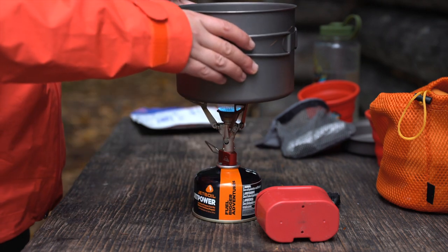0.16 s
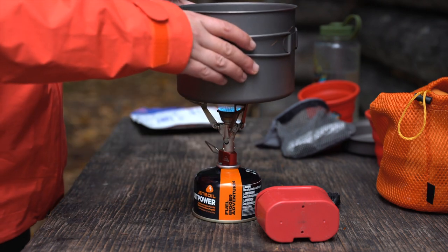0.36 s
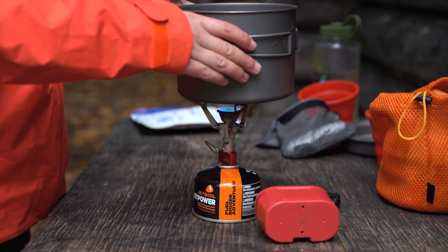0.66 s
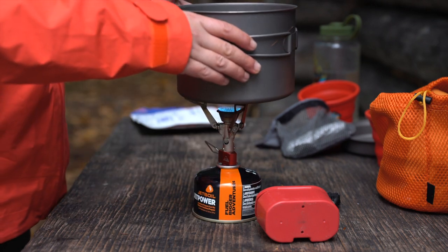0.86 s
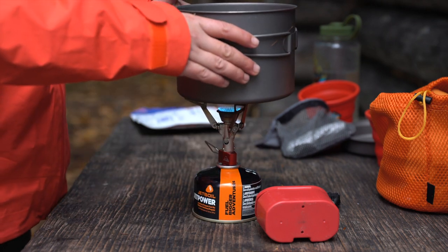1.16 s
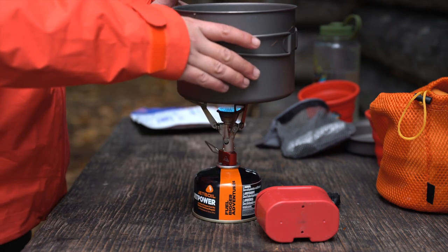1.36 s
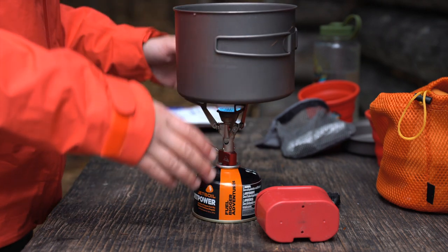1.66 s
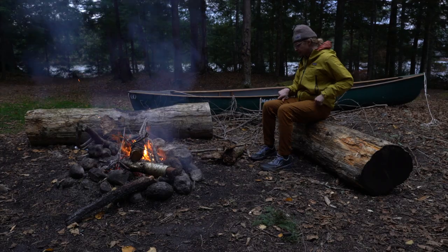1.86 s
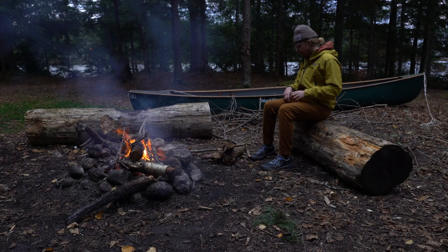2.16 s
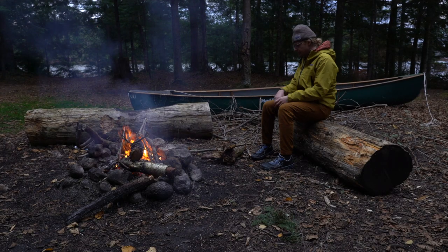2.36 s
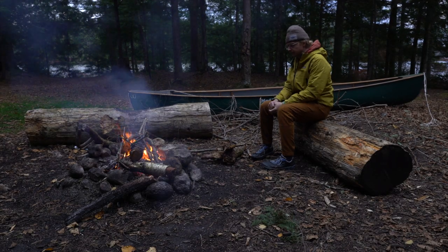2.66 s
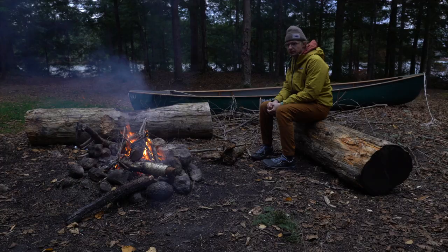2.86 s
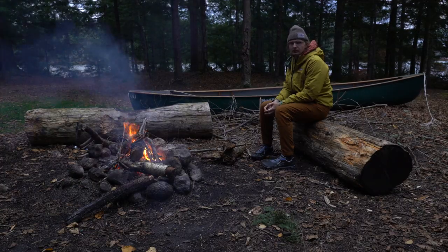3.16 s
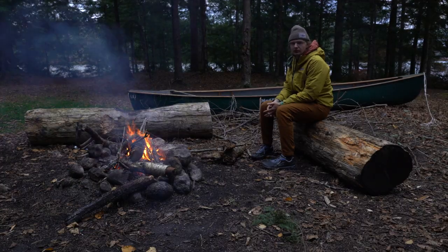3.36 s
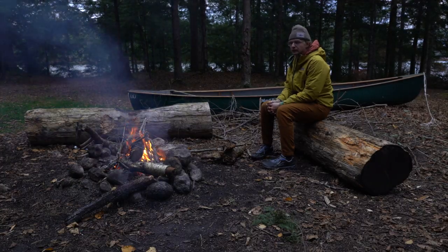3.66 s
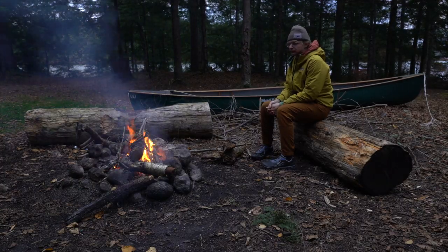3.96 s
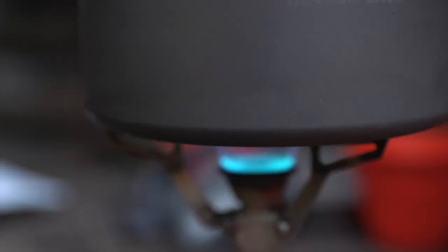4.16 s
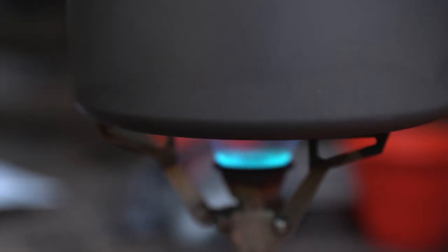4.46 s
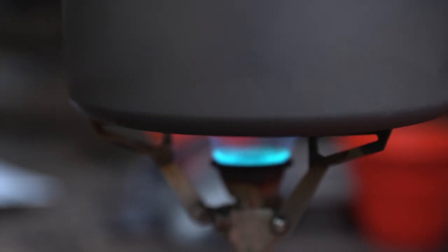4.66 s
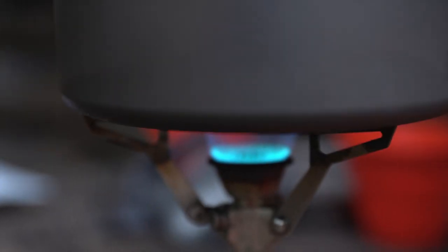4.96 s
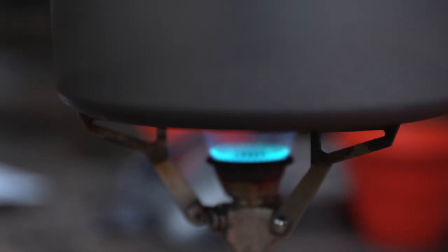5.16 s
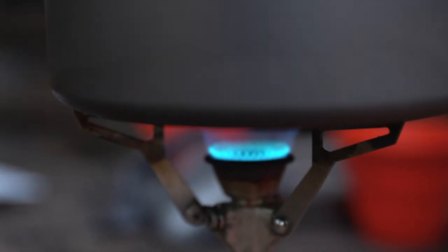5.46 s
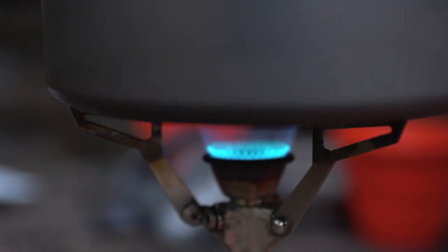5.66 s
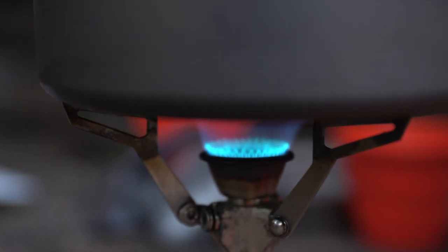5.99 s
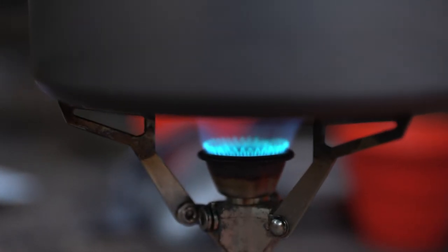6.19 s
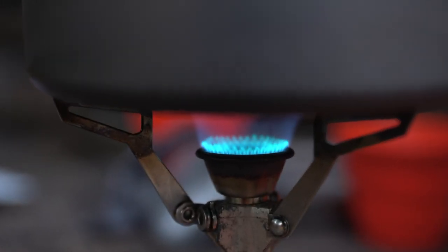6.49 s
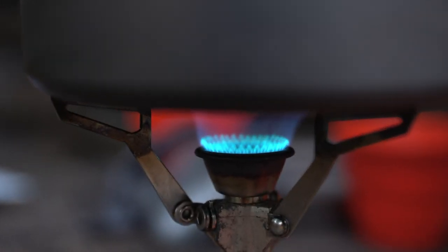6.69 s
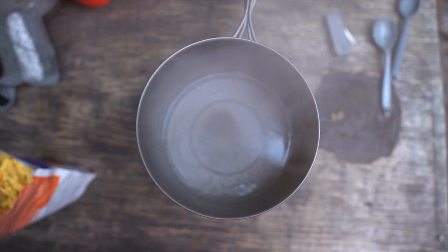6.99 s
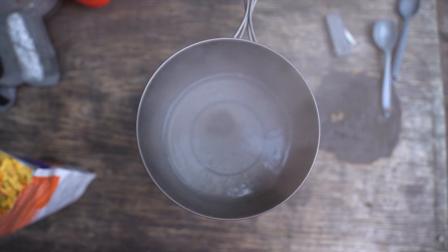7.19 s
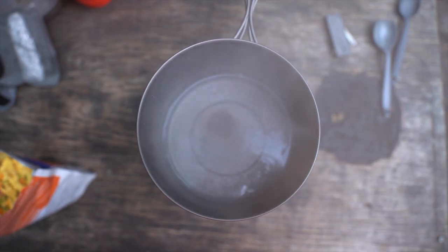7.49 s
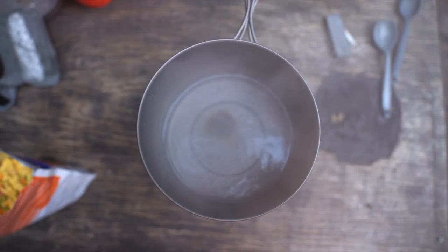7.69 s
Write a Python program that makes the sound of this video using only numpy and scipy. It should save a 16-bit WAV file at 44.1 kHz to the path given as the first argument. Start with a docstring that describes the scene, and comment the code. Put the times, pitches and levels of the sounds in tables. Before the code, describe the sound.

A gas camping stove roars softly under a ticking metal pot that clanks down, with a brief cut to a crackling campfire.

```python
"""In a forest, a gas camping stove burns under a metal pot, heard from beside it, close up and from above.
Turbulent gas roars through the resonances of the burner and of the gap under the pot. The pot ticks
by stick-slip on its hot steel supports and lands with a clank; jacket cloth rustles by friction.
Between the first two positions the scene cuts to a campfire that flutters, pops and vents steam.
Ticks, clanks and pops echo off the trunks, and loud peaks make a limiter duck the flame."""
import sys
import numpy as np
from scipy import signal
from scipy.fft import rfft, irfft, next_fast_len
from scipy.io import wavfile
from scipy.ndimage import uniform_filter1d, minimum_filter1d, map_coordinates

SR = 44100
rng = np.random.default_rng(int(sys.argv[2]) if len(sys.argv) > 2 else 0)


def generate_wav(sig):
    """Save sig (samples, or channels by samples) to the path in sys.argv[1] as 16-bit PCM at SR."""
    pcm = np.round(np.clip(np.atleast_2d(sig).T, -1, 1) * 32767).astype(np.int16)
    wavfile.write(sys.argv[1], SR, pcm)


N = 345285
TIME = np.arange(N) / SR
HIT_TIME = np.arange(SR // 8) / SR
LEAD, TAIL = 512, 12288  # samples of room before a hit, samples of its echo

# Bounds in seconds of the four views: stove side, campfire, stove close up, stove from above.
CUTS = [0.001, 1.726, 4.158, 6.759, 7.9]
# Turbulence spectra. Each row: frequency in Hz, left and right relative level in dB, stereo correlation.
FOREST_SPECTRUM = [(30, -33.2, -32.7, 0.95), (100, -26, -25, 0.9), (241, -11.5, -11.5, 1),
                   (420, -11, -11.5, 0.9), (630, -5.5, -5.5, 0.81), (1120, 0.5, -0.8, 0.65),
                   (1350, -0.8, -3.5, 0.57), (1900, -6, -6, 0.4), (3480, -15.5, -15.5, 0.12),
                   (6000, -17, -16.5, 0.12), (9150, -19, -17.5, 0.12), (12500, -20.5, -20.5, 0.17),
                   (15500, -23.2, -23, 0.15)]
SIDE_SPECTRUM = [(30, -42, -44, 0.98), (100, -21, -21, 0.96), (210, -14.5, -13, 1), (390, -4, -2.5, 1),
                 (620, -3, -1, 0.97), (1000, -1.5, -2, 0.87), (1400, -1.5, 0.5, 0.97), (1930, -8, -5, 0.61),
                 (3080, -10.5, -8.5, 0.53), (5960, -17, -16, 0.12), (9300, -18.5, -17, 0.2),
                 (12400, -22.5, -21, 0.2), (15500, -23, -21, 0.24)]
CLOSE_SPECTRUM = [(30, -49, -48, 0.9), (100, -30, -30, 0.99), (224, -16.5, -16.5, 1.0), (387, -5, -6, 0.99),
                  (615, -1, -1.5, 0.96), (1035, -11, -11, 0.75), (1360, 2.4, 3, 0.79),
                  (1920, -13.5, -12.5, 0.087), (3500, -16, -18.5, -0.42), (5700, -23.5, -18, 0.33),
                  (8950, -31.5, -31, 0.23), (12500, -32, -30.5, 0.35), (15500, -34.8, -32, 0.2)]
ABOVE_SPECTRUM = [(30, -56, -58, 0.99), (100, -20, -20, 1.0), (220, -16.5, -17, 1), (415, -2, -1, 0.99),
                  (630, -10.5, -9, 0.97), (1000, -14, -15, 0.89), (1400, -12, -8, 0.98),
                  (1920, -15.5, -12.5, 0.99), (3450, -19, -19, 0.44), (6000, -20.5, -18, 0.43),
                  (9000, -25, -19.5, 0.37), (12500, -24.5, -20.5, 0.3), (15500, -23, -26, 0.18)]
# Spectra of the smaller sources. Each row: frequency in Hz, relative level in dB.
CLOTH_SPECTRUM = [(80, -45), (300, -18), (1500, 6), (4000, 5.5), (9000, -0.5), (16000, -9.5)]
FLUTTER_SPECTRUM = [(20, -12), (50, -4), (90, -2), (150, -9), (300, -37), (900, -90)]
STEAM_SPECTRUM = [(800, -25), (3000, -7), (7000, 1.5), (11000, -3), (16000, -5)]
SNAP_SPECTRUM = [(150, -38), (500, -21), (1200, -8.5), (2200, -2), (3400, -5), (5500, 3), (8000, 3.5),
                 (12000, -5), (15800, -10.5)]
CLANK_SPECTRUM = [(40, -38), (160, -27), (250, -10), (480, -3), (720, -10), (1400, -2), (2300, -3.5),
                  (2650, -22), (4500, -13), (7000, -13), (10500, -16.5), (13000, -29), (16000, -30)]
# Reverberation among the trunks. Each row: frequency in Hz, time to fall 60 dB in seconds.
TREE_REVERB = [(200, 0.14), (1500, 0.26), (5000, 0.3), (9000, 0.27), (15000, 0.22)]
# Distant rush of the forest. Each row: time in seconds, relative level in dB.
FOREST_LEVELS = [(1.75, -56.5), (2.3, -56), (4.1, -58.5)]
# Arm strokes and campfire flares. Each row: peak in seconds, relative level in dB, half length in seconds.
JACKET_STROKES = [(.042, -45, 0.011), (.21, -48, 0.012), (.8, -78, 0.062), (1.875, -51.5, 0.028),
                  (2.41, -53, 0.27)]
FLARES = [(1.748, -57.5, .02), (1.9, -70, .03), (2.122, -60, .022), (2.668, -60.5, .042), (2.81, -71, .025),
          (3.04, -71, .06)]
# Wood pops. Each row: start in seconds, relative level, body and brightness in dB, ring in Hz.
POPS = [(2.0813, -50, -8, 0, 4400), (2.1127, -47, -5, 7, 3100), (2.1556, -47, 15, -2, 5800),
        (2.1738, -42, 9, -8, 3940), (2.3262, -43, 10, -2, 5160), (2.558, -36.5, 9.5, 5, 4940),
        (2.67, -44.5, 5, -5, 3400), (2.7438, -39, 6, -3, 3300), (2.831, -32.5, 6, -4, 5460),
        (2.959, -49, 6, -12, 2500), (3.2079, -48.5, 2, -21, 3120), (3.5058, -50.5, 4, 4, 3400),
        (3.9889, -28.5, 2.5, -11, 3730), (4.0212, -42, 12, -5, 5800), (4.0493, -40, -6, -5, 5000)]
# A typical faint pop: relative level, body and brightness in dB.
FAINT_POP = (-61, 2, -3)
# Slips of the pot. Each row: start in seconds, relative level, body and brightness in dB, ring in Hz,
# chatter decay in seconds.
TICKS = [(0.0117, -33.5, 3, 3, 7050, 0.00035), (0.3619, -25.5, 2, 14.5, 6670, 0.0016),
         (0.5933, -34.5, 5, 11, 6600, 0.0015), (0.736, -32, 9, 6.5, 4500, 0.003),
         (0.9941, -34.5, 10, 6, 4460, 0.0016), (1.2902, -41, 6, 12, 6600, 0.0018),
         (1.3795, -35, -4, 15.5, 6600, 0.0003), (1.5532, -41.5, -10, 6, 12000, 0.0014),
         (1.5731, -19.5, 5, 5, 5570, 0.0018), (4.2619, -29, -3, 11, 7540, 0.00032),
         (4.3241, -35, 9, 2, 11200, 0.0007), (4.391, -35.5, -5, 14, 7500, 0.0004),
         (4.4442, -24.5, 4, 0, 4600, 0.0006), (5.021, -30.5, -15, 13, 5940, 0.0004),
         (5.1391, -38, -15, 4, 11300, 0.0003), (5.2572, -30.5, 6, 9, 8100, 0.0005),
         (5.8493, -12.5, -1, -6, 5730, 0.00057), (5.879, -15.5, 5.5, 6, 5500, 0.0014),
         (6.0814, -22.5, 1, 5.5, 5400, 0.0004), (6.221, -37.5, -8, 11, 14000, 0.00082),
         (6.2395, -35.5, -9, 9, 4500, 0.00065), (6.3051, -26.5, 9.5, 2.5, 11200, 0.00093),
         (6.3808, -37.5, -15, -2, 13000, 0.00052), (7.064, -32.5, 16.5, 2, 4940, 0.002),
         (7.247, -35, 11, -8, 8500, 0.0015)]
# A typical faint slip: the same columns without the start.
FAINT_TICK = (-49.5, -2, 1, 9000, .0004)
# The pot drops, and later settles. Each row: start in seconds, relative level in dB.
CLANKS = [(1.6666, -17), (4.4441, -28)]
# Damped modes of the pot wall. Each row: frequency in Hz, width in Hz, lift in dB.
POT_MODES = [(454, 69, 4.5), (1030, 66, 2), (1390, 81, 0.5), (1840, 64, 4)]
# Resonances and nulls of the jet, the burner tube and the gap under the pot.
# Each row: frequency in Hz, width in Hz, left and right lift in dB.
SIDE_PEAKS = [(322, 17, 8, 5), (483, 34, 7.5, 4.5), (711, 54, 6.5, 7.5), (1164, 128, 8, 8),
              (1372, 45, 6.5, 6.5), (2268, 21, 10.5, 10), (2710, 39, 7, 6.5), (3340, 70, 7.5, 5),
              (4907, 230, 6, 6)]
CLOSE_PEAKS = [(210, 8.4, 4.5, 6.5), (420, 84, 6, 8.5), (748, 82, 1.4, 4.5), (1023, 75, 0.5, 13.5),
               (1410, 73, 1, 1.5), (1558, 35, -3, 10), (1656, 31, -4.5, -9), (2054, 345, 10, 7),
               (2350, 45, -12, -11), (2580, 400, 2, 10.5), (3790, 310, -2.5, 0), (4688, 320, 4, 6.5),
               (8350, 672, 2, 3), (9930, 960, 4.5, 8)]
ABOVE_PEAKS = [(134, 12, 7, 7.5), (349, 22, 7.5, 8), (455, 96, 9.5, 9), (640, 25, -5, -5),
               (924, 170, 6, 8.5), (1070, 28, -7, -8), (1172, 68, 10.5, 11.5), (1414, 174, 9.5, 10),
               (1930, 70, 1, 4.5), (2480, 127, 11.5, 13), (5040, 290, 4, 4), (9900, 260, 3, 2),
               (11200, 2240, 9.6, 5.5), (11700, 520, 2.5, 1.5), (13500, 300, 3, 4)]
# Strength of the gas flame. Each row: time in seconds, relative level in dB, extra jet hiss in dB.
SIDE_FLAME = [(0, -44, -1), (.8, -45, -1), (1.7, -45.5, -0.5)]
CLOSE_FLAME = [(4.15, -39, -0.12), (6.2, -38.2, -0.33), (6.75, -38.5, 0.048)]
ABOVE_FLAME = [(6.75, -43.5, 0), (7.83, -44.5, 0)]


def amp(db):
    """Amplitude grows tenfold for every 20 dB."""
    return 10 ** (np.asarray(db) / 20)


def unit(x):
    """Power normalisation to rms 1."""
    return x / np.sqrt(np.mean(x ** 2) + 1e-20)


def unit_energy(x):
    """Energy normalisation: a hit carries as much as 5 ms at rms 1."""
    return x * np.sqrt(.005 * SR / np.sum(x ** 2))


def along(points, hz):
    """Interpolation of each table column over log frequency."""
    knots_hz, *columns = np.transpose(points)
    return np.array([np.interp(np.log(hz + 1), np.log(knots_hz), c) for c in columns])


def curves(rows):
    """Linear interpolation of each table column over time."""
    knots_s, *columns = np.transpose(rows)
    return np.array([np.interp(TIME, knots_s, c) for c in columns])


def wobble(rate):
    """Smooth random modulation: a spline through rate knots a second."""
    return map_coordinates(rng.standard_normal(int(N * rate / SR) + 4), [TIME * rate])


def swells(rows, steepness):
    """An amplitude envelope as a sum of bell-shaped swells."""
    return sum(amp(db) / (1 + ((TIME - s) / half) ** 2) ** steepness for s, db, half in rows)


def bell(x, centre, width):
    """A Gaussian curve, the shape given to a resonance."""
    return np.exp(-((x - centre) / width) ** 2)


def filtered(x, response):
    """Linear filtering: the spectrum is multiplied by a frequency response."""
    n = x.shape[-1]
    size = next_fast_len(n + 2048, real=True)
    return irfft(rfft(x, size) * response(np.fft.rfftfreq(size, 1 / SR)), size)[..., :n]


def noise(spectrum, channels=2):
    """Spectrally shaped noise of rms 1, uncorrelated between channels."""
    return unit(filtered(rng.standard_normal((channels, N)), lambda hz: amp(along(spectrum, hz))))


def add(track, s, sound):
    """Superposition of a sound on the track from s seconds on."""
    part = track[:, max(round(s * SR), 0):][:, :sound.shape[-1]]
    part += sound[..., :part.shape[-1]]


def turbulence(spectrum, peaks=()):
    """Turbulent noise of rms 1, shaped by resonances; long waves are coherent across the channels."""
    size = next_fast_len(N)
    hz = np.fft.rfftfreq(size, 1 / SR)
    left_db, right_db, correlation = along(spectrum, hz)
    level_db = np.array([left_db, right_db])
    for centre, width, *lift_db in peaks:
        level_db += np.outer(lift_db, bell(hz, centre, width))
    angle = np.arccos(np.clip(correlation, -1, 1)) / 2
    mid, side = rfft(rng.standard_normal((2, size))) * [np.cos(angle), np.sin(angle)]
    return unit(irfft(np.array([mid + side, mid - side]) * amp(level_db), size)[:, :N])


def strike(response, decay_s, echo_db, scatter_db=-17, scatter_s=0.0052, rise_s=0.0008, spread=0.78):
    """Impulsive excitation: nearby things scatter a short burst and the trunks return a diffuse tail."""
    air = rng.standard_normal(len(HIT_TIME)) + spread * rng.standard_normal((2, len(HIT_TIME)))
    burst = air * (np.exp(-HIT_TIME / decay_s) + amp(scatter_db) * np.exp(-HIT_TIME / scatter_s))
    hz, t, diffuse = signal.stft(rng.standard_normal((2, TAIL)), SR, nperseg=256)
    envelope = amp(-60 * t / along(TREE_REVERB, hz).T) * (1 - np.exp(-t / rise_s))
    _, tail = signal.istft(diffuse * envelope, SR, nperseg=256)
    padded = (np.pad(x, ((0, 0), (LEAD, TAIL + LEAD - x.shape[1]))) for x in (burst, tail))
    direct, echo = (unit_energy(filtered(x, response)) for x in padded)
    return direct + amp(echo_db) * echo


def snap(body_db, bright_db, ring_hz, decay_s, echo_db, ring_db=6, ring_width=0.29):
    """A tiny fracture or slip radiates a broadband pulse with one broad resonance."""
    tilt = [(2400, body_db), (4500, 0), (7500, 0), (13000, bright_db)]
    ring = lambda hz: ring_db * bell(np.log(hz + 1), np.log(ring_hz), ring_width)
    return strike(lambda hz: amp(along(SNAP_SPECTRUM, hz) + along(tilt, hz) + ring(hz)), decay_s, echo_db)


def forest(gain_db=5.0):
    """Ambient noise: the forest rushes far behind the fire."""
    return amp(curves(FOREST_LEVELS) + gain_db) * turbulence(FOREST_SPECTRUM)


def jacket(gain_db=3.0, grain_db=2.0):
    """Friction noise: stiff cloth rubs in tiny uneven slips as an arm moves."""
    grain = amp(gain_db + grain_db * wobble(300))
    return swells(JACKET_STROKES, steepness=1.7) * grain * noise(CLOTH_SPECTRUM)


def flutter(gain_db=-8.0, floor_db=-88, swing_db=6):
    """Unsteady combustion: the campfire flares in low puffs and wavers faintly between them."""
    envelope = swells(FLARES, steepness=1.6) + amp(floor_db + swing_db * wobble(12))
    return amp(gain_db) * envelope * noise(FLUTTER_SPECTRUM, channels=1)


def steam(start_s=3.988, steady_db=-50.5, spurt_db=10, spurt_s=.04, rise_s=.006, sputter_db=1.0):
    """Jet noise: steam spurts from a split log, then settles to a sputtering hiss."""
    age = np.maximum(TIME - start_s, 0)
    level_db = steady_db + spurt_db * np.exp(-age / spurt_s) + sputter_db * wobble(500)
    return np.minimum(age / rise_s, 1) * amp(level_db) * noise(STEAM_SPECTRUM)


def crackle(gain_db=2, echo_db=-13, faint_count=16, spread_db=4, db_per_doubling=13):
    """Sudden pressure release: pockets of sap burst in the logs, loud pops among faint ones."""
    track = np.zeros((2, N))
    faint_db, *faint_timbre = FAINT_POP
    faint = [(CUTS[1] + when * (CUTS[2] - CUTS[1]), faint_db + spread_db * (2 * size - 1),
              *faint_timbre, 3000 + 5000 * pitch) for when, size, pitch in rng.random((faint_count, 3))]
    for s, db, *timbre in POPS + faint:
        decay_s = 0.00059 * 2 ** ((db + 40) / db_per_doubling)  # bigger pockets take longer to burst
        pop = snap(*timbre, decay_s, echo_db, ring_db=8, ring_width=0.19)
        add(track, s - LEAD / SR, amp(db + gain_db) * pop)
    return track * amp([[-1.2], [.8]])


def pot_ticks(left_db=1.5, right_db=6.0, lag_s=.00016, faint_count=16, spread_db=4):
    """Stick-slip: the pot jerks on its hot supports, heard sooner and louder on the right."""
    track = np.zeros((2, N))
    faint_db, *faint_timbre = FAINT_TICK
    faint = [(when * N / SR, faint_db + spread_db * (2 * size - 1), *faint_timbre)
             for when, size in rng.random((faint_count, 2))]
    for s, db, body_db, bright_db, ring_hz, decay_s in TICKS + faint:
        echo_db = -7.5 + 3.5 * np.log2(decay_s / .001)  # longer chatter leaves a stronger tail
        tick = amp(db) * snap(body_db, bright_db, ring_hz, decay_s, echo_db)
        add(track, s + lag_s - LEAD / SR, tick * [[amp(left_db)], [0]])
        add(track, s - LEAD / SR, tick * [[0], [amp(right_db)]])
    return track


def pot_clanks(decay_s=0.0022, echo_db=-0.5):
    """Impact excites modes: the pot lands, its rim rattles and its damped wall answers."""
    track = np.zeros((2, N))
    wall_db = lambda hz: sum(lift * bell(hz, centre, width) for centre, width, lift in POT_MODES)
    for s, db in CLANKS:
        hit = strike(lambda hz: amp(along(CLANK_SPECTRUM, hz) + wall_db(hz)), decay_s, echo_db)
        # Long waves reach both sides alike; short ones favour the right.
        bass = filtered(hit, lambda hz: 1 / (1 + (hz / 700) ** 4))
        treble = (hit - bass) * amp([[-2.5], [2]])
        add(track, s - LEAD / SR, amp(db) * (1.07 * bass.mean(axis=0) + treble))
    return track


def burner(flame, spectrum, peaks, gain_db, flicker_db, hollow_db_per_s=0, gap_hz=1310, gap_width_hz=140):
    """Turbulence drives cavity resonances: the flame roars under the pot and the gas jet hisses."""
    level_db, jet_db = curves(flame)
    gas = turbulence(spectrum, peaks)
    jet = filtered(gas, lambda hz: 1 - 1 / (1 + (hz / 3500) ** 4))
    # The hollow note of the gap under the pot may grow, passing unit gain midway.
    hollow = filtered(gas, lambda hz: bell(hz, gap_hz, gap_width_hz))
    midway_s = (flame[0][0] + flame[-1][0]) / 2
    roar = gas - jet + hollow * (amp(hollow_db_per_s * (TIME - midway_s)) - 1)
    flicker = amp(flicker_db * (.5 * wobble(9.9) + wobble(45)))
    return amp(level_db + gain_db) * (roar * flicker + jet * amp(jet_db))


def scene():
    """Sources superpose in each of four views, joined by hard cuts."""
    pot = pot_ticks() + pot_clanks()
    cloth = jacket()
    side = burner(SIDE_FLAME, SIDE_SPECTRUM, SIDE_PEAKS, gain_db=-0.4, flicker_db=-0.36)
    campfire = forest() + flutter() + steam() + crackle()
    close = burner(CLOSE_FLAME, CLOSE_SPECTRUM, CLOSE_PEAKS, gain_db=1.05, flicker_db=.5,
                   hollow_db_per_s=2.15)
    above = burner(ABOVE_FLAME, ABOVE_SPECTRUM, ABOVE_PEAKS, gain_db=3.0, flicker_db=1.0)
    views = [side + pot + cloth, campfire + cloth, close + pot, above + pot]
    gates = [1.0 * ((TIME >= start) & (TIME < end)) for start, end in zip(CUTS, CUTS[1:])]
    return sum(uniform_filter1d(gate, size=128) * view for gate, view in zip(gates, views))


def limiter(x, ceiling_db=-2.5, hold_s=0.032, release_db_per_s=130):
    """Peak limiting: peaks over the ceiling pull the gain down at once; it holds, then recovers."""
    peak_db = 20 * np.log10(np.abs(x).max(axis=0) + 1e-9)
    need_db = np.minimum(ceiling_db - peak_db, 0)
    hold = 2 * int(hold_s * SR / 2) + 1
    held_db = minimum_filter1d(need_db, hold, origin=hold // 2)
    climb_db = release_db_per_s * TIME
    gain_db = np.minimum.accumulate(held_db - climb_db) + climb_db
    return x * amp(uniform_filter1d(minimum_filter1d(gain_db, size=65), size=65))


def record(dry):
    """Peak limiting, then band limiting at 15950 Hz."""
    return filtered(limiter(dry), lambda hz: hz < 15950)


dry = scene()
out = record(dry)
generate_wav(out)
```